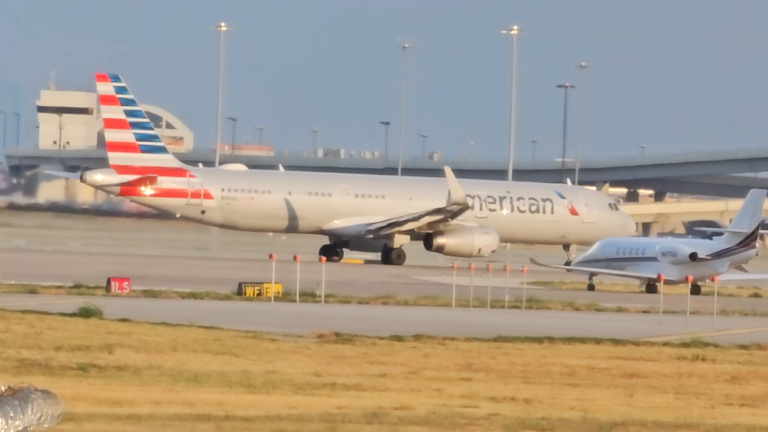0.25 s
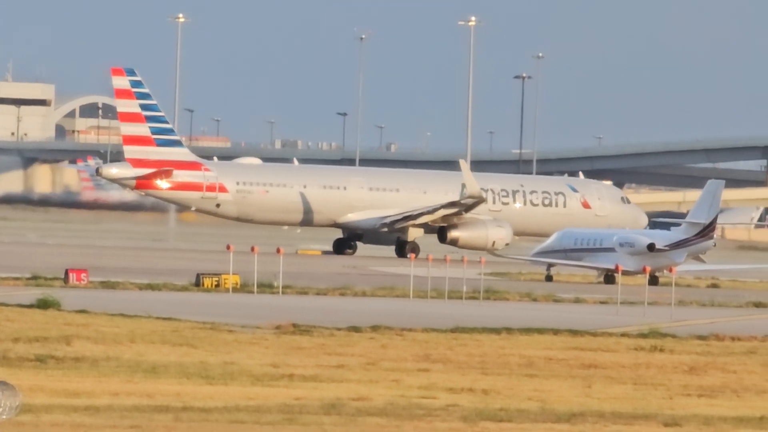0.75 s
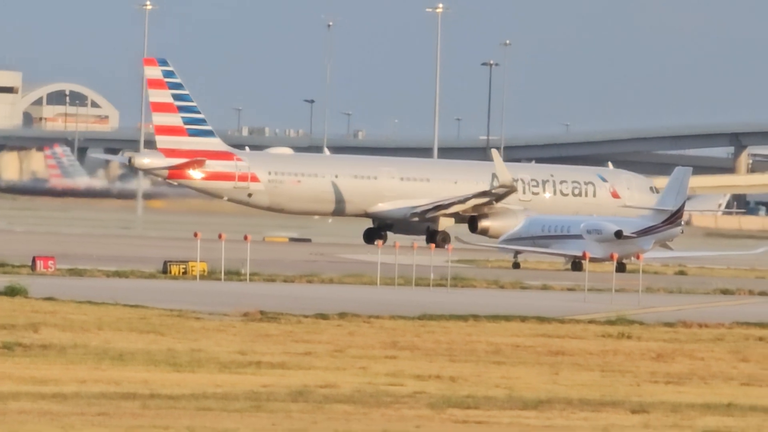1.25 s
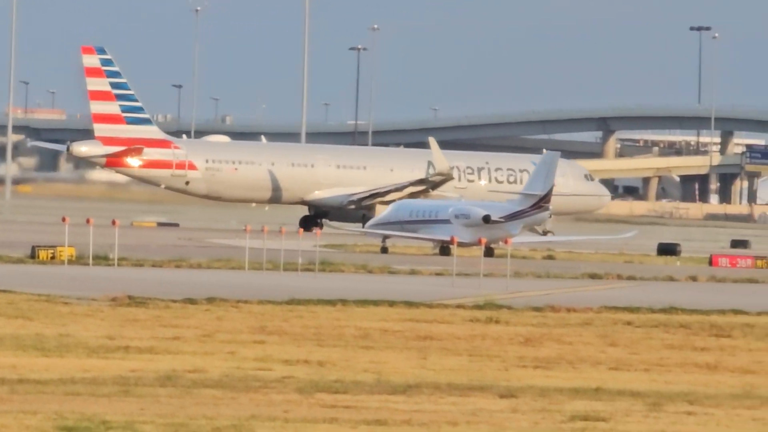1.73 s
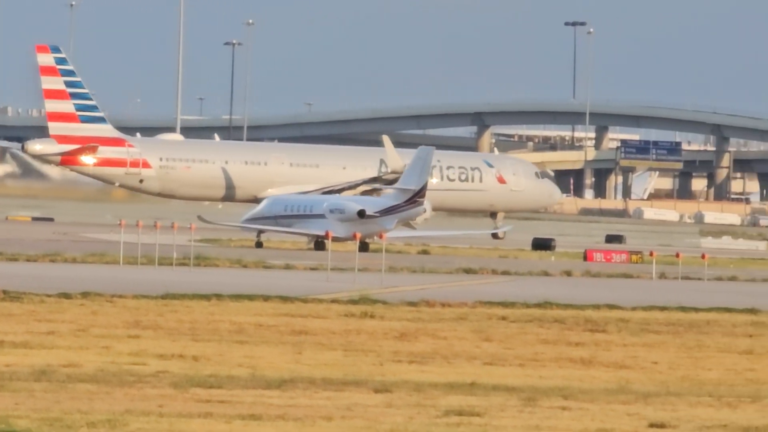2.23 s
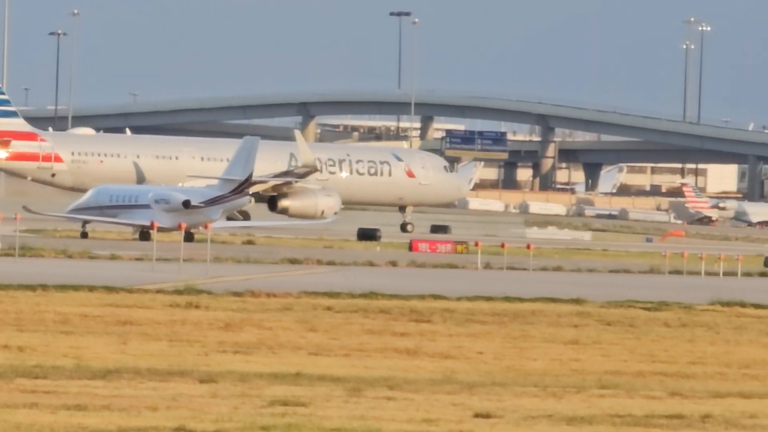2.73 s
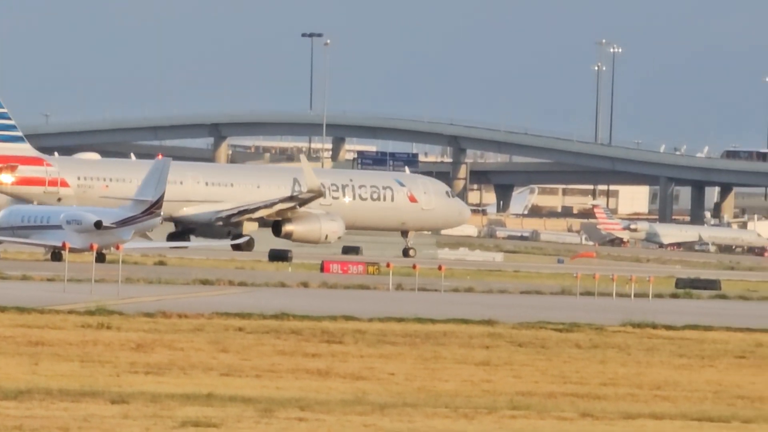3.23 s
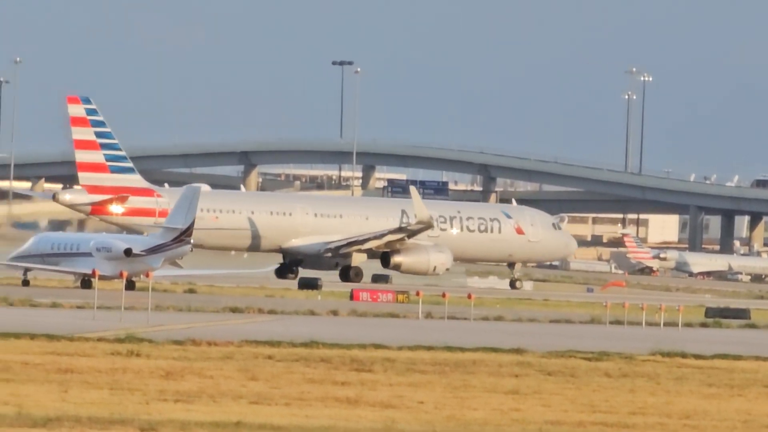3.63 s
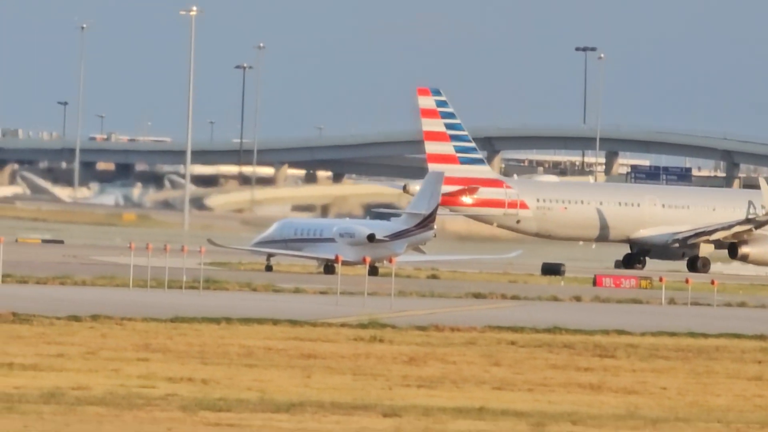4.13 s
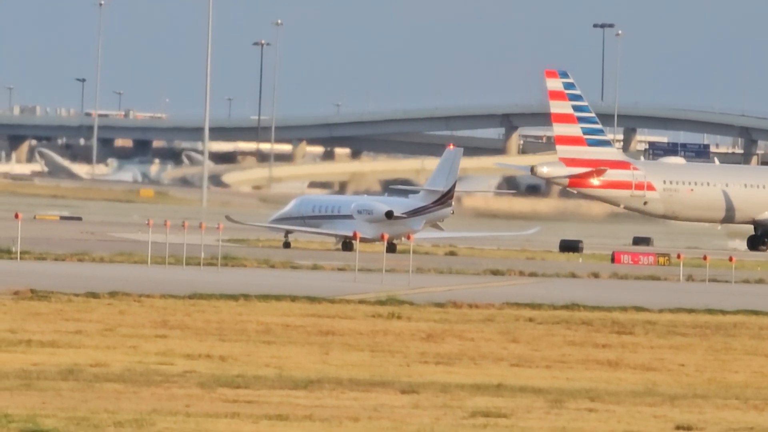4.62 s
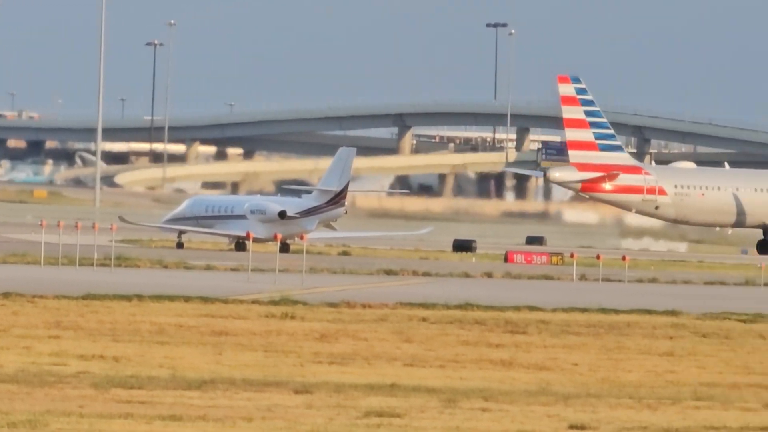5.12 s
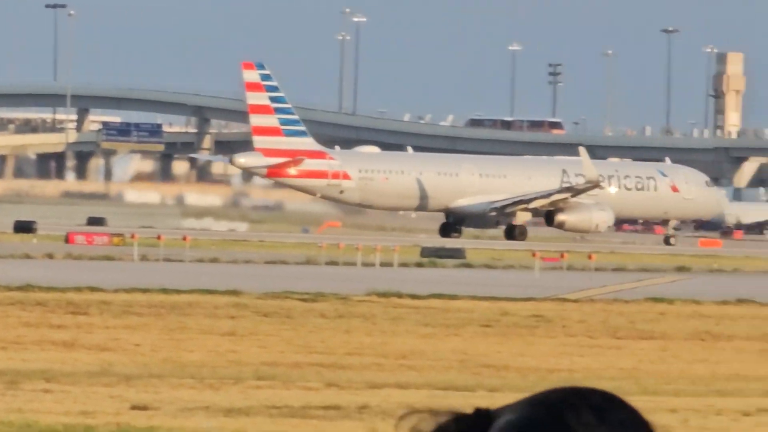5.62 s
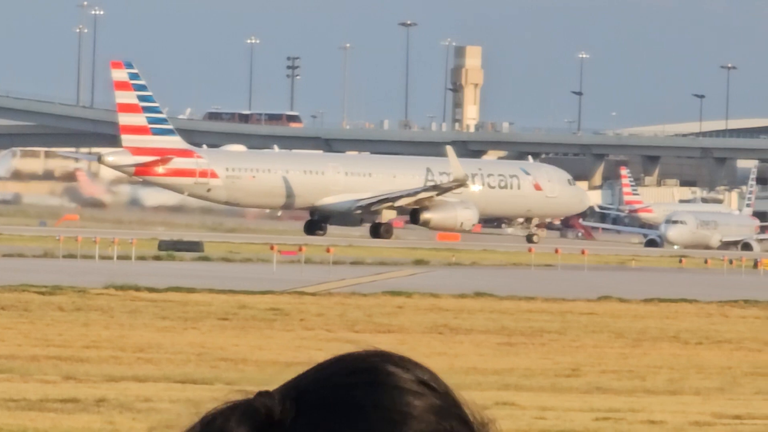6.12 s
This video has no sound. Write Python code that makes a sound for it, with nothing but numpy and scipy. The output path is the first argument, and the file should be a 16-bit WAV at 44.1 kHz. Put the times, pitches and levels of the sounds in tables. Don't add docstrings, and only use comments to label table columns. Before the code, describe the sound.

A phone microphone catches a distant taxiing airliner across open grass. First comes dull background rumble and a soft steady machine hum, then a brief rising turbine whine. The jet exhaust builds into a broad, bass-heavy roar with muted hiss, remaining loud and uneven as wind shifts its lows. Very faint high focus-motor rasping leans right, with small shell ticks and a light cloth brush late on.

```python
import sys
import numpy as np
from scipy import signal
from scipy.fft import rfft, irfft, next_fast_len
from scipy.io import wavfile
from scipy.ndimage import uniform_filter1d, minimum_filter1d, map_coordinates

SR = 44100
rng = np.random.default_rng(int(sys.argv[2]) if len(sys.argv) > 2 else 0)


def linear_from_db(decibels):
    return 10 ** (np.asarray(decibels, float) / 20)


def wav_out(sig):
    wavfile.write(sys.argv[1], SR, np.round(np.clip(np.atleast_2d(sig).T, -1, 1) * 32767).astype(np.int16))


N = 280476

# pitch_hz, density_db (per Hz)
AIRFIELD_SPECTRUM = [(15, -32), (25, -13.5), (82, 1.5), (297, -20.5), (389, -4), (457, -9.5), (848, -21.5),
                     (1020, -16.5), (1380, -19), (1800, -28.5), (2120, -23), (3930, -36.5), (6730, -54.5),
                     (9050, -53.5), (15500, -67)]
# pitch_hz, correlation_0to1
AIRFIELD_LIKENESS = [(60, 0.35), (240, 0.25), (950, 0.77), (3770, 0.19), (15000, 0.11)]
# start_s, pitch_hz, level_db
MACHINE_HUM = [
    (0, 390, -54),
    (.12, 391, -43),
    (.3, 393, -39.5),
    (.7, 394.5, -38),
    (.8, 393, -52),
    (1.05, 393, -52),
    (1.2, 392, -42),
    (2.2, 392, -43),
    (2.5, 392, -60),
]
# start_s, level_db
LENS_EFFORT = [(0, -68), (.3, -67.5), (.9, -65), (1.27, -65.5), (1.54, -60), (1.9, -62), (2.01, -57.5),
               (2.15, -62.5), (2.95, -61.5), (3.4, -62), (4.15, -62.5), (4.3, -60), (4.85, -58.5),
               (5.3, -59), (5.9, -62), (6.36, -61)]
# pitch_hz, gain_db
BODY_TO_LEFT = [(5000, -61.5), (6800, -21), (7300, -10.5), (9000, -10.5), (9800, -12.5), (10100, -18),
                (10900, -10.5), (11500, -8), (12300, -10.5), (13500, -11.5), (14100, -14), (15200, -13),
                (15600, -10)]
# pitch_hz, gain_db
BODY_TO_RIGHT = [(5000, -61), (6800, -17.5), (7300, -11), (7900, -11), (8150, -1), (8300, -14),
                 (8700, -1.5), (9000, -6), (9200, 2), (9700, -4), (10400, -7), (11000, -8), (11400, -4),
                 (11800, -10), (15500, -10.5)]
# pitch_hz, gain_db
STRAIN_COLOUR = [(6800, 1.5), (7500, 3.5), (8000, -2.5), (9200, 0), (9900, 0.5), (10400, 0), (11400, 3.5),
                 (11800, -0.5)]
# start_s, peak_db, left_over_right_db
SHELL_TICKS = [
    (0.166, -57, -2.5),
    (1.101, -50.5, -0.5),
    (1.662, -49, 0),
    (2.1742, -43.5, -3),
    (2.994, -50, -4),
    (3.262, -51, -4),
    (3.328, -51, -4),
    (4.537, -48, 7),
    (4.828, -51, -4),
]
# centre_s, half_length_s, level_db
CLOTH_BRUSHES = [
    (4.925, .02, -52),
    (4.973, .02, -47.5),
]
# start_s, blade_pitch_hz, level_db, overtone_level_db
FAN_WHINE = [
    (.9, 1440, -70, -70),
    (1.08, 1485, -56, -56),
    (1.22, 1525, -45, -52),
    (1.36, 1570, -37, -55),
    (1.5, 1615, -41, -59),
    (1.62, 1650, -50, -64),
    (1.85, 1720, -44, -62),
    (1.95, 1745, -54, -66),
    (2.4, 1850, -70, -70),
]
# start_s, roar_level_db, aft_0to1 (how far the exhaust points this way)
THRUST = [(0, -38.5, 0.14), (.3, -38, 0), (.7, -39, 0.37), (1, -35.5, 0.54), (1.3, -34, 0.87),
          (1.7, -28, 0.13), (2.1, -26.5, 0.55), (2.5, -23, 0), (2.9, -22.5, 0.06), (3.15, -20.5, 0),
          (3.4, -21, 0), (3.85, -21.5, 0.3), (4.1, -23, .6), (4.65, -22.5, 0.95), (5.2, -23.5, 1),
          (5.6, -23.5, 0.3), (5.9, -22.5, 0.4), (6.36, -22, 0)]
# pitch_hz, density_db (per Hz)
EXHAUST_SPECTRUM = [(15, -42), (28, -12), (65, 3), (85, -2.5), (100, -3), (160, -12), (280, -11.5),
                    (700, -22), (1500, -29.5), (2300, -35), (4000, -44.5), (4600, -49.5), (5200, -56.5),
                    (6800, -68), (9000, -110)]
# pitch_hz, correlation_0to1
EXHAUST_LIKENESS = [(30, 0.63), (70, 0.94), (150, 0.98), (380, 0.98), (950, 0.96), (2380, 0.86),
                    (5980, 0.27), (15000, 0.051)]
# centre_s, half_length_s, hiss_db
STILL_AIR = [
    (2.5, 0.074, 0.5),
    (3.45, .25, 4),
    (3.82, 0.07, 4),
    (4.82, 0.11, 4.5),
]
# centre_s, half_length_s, rumble_db, drone_db
PATH_GUSTS = [(.15, 0.1, -5.5, -1.5), (.39, 0.025, 1, 4.5), (.55, 0.07, -5, -1), (.75, 0.025, -11, -3),
              (.98, 0.022, 8.5, 5.5), (1.35, .04, 3.5, 0.5), (1.55, .1, 1, 2), (1.97, 0.034, -0.5, -3.5),
              (2.13, 0.048, 4, 0), (2.2, 0.035, -1, -1), (2.41, 0.028, -2, 4), (2.52, .02, -3, 0),
              (2.95, 0.05, 0.5, 6.5), (3.03, .025, -10, 1), (3.45, 0.14, 2, -1), (3.8, 0.027, -2.5, 3.5),
              (3.91, 0.054, -15, -0.5), (3.96, 0.061, 3, -8), (4.02, 0.019, -14.5, -0.5),
              (4.1, 0.052, -1, 0.5), (4.2, 0.043, 3, 3.5), (4.38, 0.022, -2, -3.5), (4.51, 0.029, -4.5, 5),
              (5.31, 0.031, 1.5, -3), (5.35, 0.023, 1.5, -8.5), (5.45, 0.057, -9, -1), (5.57, 0.097, 4, -1),
              (5.67, .025, 1, 1.5), (5.89, 0.044, -1, 3), (6.05, 0.054, 5.5, -1)]
# pitch_hz, width_hz,
# left_depth_db, right_depth_db
REFLECTION_NOTCHES = [(442.6, 127.7, -11, -15), (1047, 134, -6.5, -10.5), (1915, 170, -4.5, -4),
                      (2592, 223, -7, -9.5), (3325, 270, -2, -5.5), (6700, 1900, -2.5, 2)]
# centre_s, half_length_s, gain_db
GAIN_DUCKS = [
    (4.65, .04, -1.5),
    (4.96, 0.032, -2.5),
    (5.62, 0.028, -3.5),
]


def unit(x):
    return x / np.sqrt(np.mean(x ** 2) + 1e-20)


def along(points, hz):
    f, v = np.transpose(points)
    return np.interp(np.log(hz + 1), np.log(f + 1), v)


def curves(rows):
    s, *cols = np.transpose(rows)
    return [np.interp(np.arange(N) / SR, s, c) for c in cols]


def bumps(rows):
    s, half, *cols = np.transpose(rows)
    knots = np.arange(0, N + 64, 64)
    bell = np.exp(-((knots[:, None] / SR - s) / half) ** 2)
    return [np.interp(np.arange(N), knots, bell @ c) for c in cols]


def wobble(rate):
    knots = rng.standard_normal(int(N * 40 / SR) + 4)
    return map_coordinates(knots, [np.arange(N) * min(rate, 40) / SR])


def filtered(x, response):
    m = next_fast_len(N + 8192)
    return irfft(rfft(x, m) * response(np.fft.rfftfreq(m, 1 / SR)), m)[..., :N]


def lowpass(x, edge_hz):
    return filtered(x, lambda hz: 1 / (1 + (hz / edge_hz) ** 8))


def rush(spectrum, alike, patchy_db):
    z = signal.stft(rng.standard_normal((2, N + 2048)), nperseg=2048)[2]
    field = uniform_filter1d(rng.standard_normal(z.shape[1:]), size=3, axis=0)
    field = uniform_filter1d(field, size=8, axis=1)
    pair = signal.istft(z * linear_from_db(patchy_db * unit(field)), nperseg=2048)[1][:, :N]

    def mid_side(hz):
        angle = np.arccos(np.clip(along(alike, hz), -1, 1)) / 2
        return linear_from_db(along(spectrum, hz)) * [np.cos(angle), np.sin(angle)]

    mid, side = filtered(pair, mid_side)
    return unit(np.array([mid + side, mid - side]))


def evened(x, share):
    power = np.abs(uniform_filter1d(np.mean(x ** 2, axis=0), size=2600))
    return unit(x / power ** (share / 2))


def tone(hz, db, unsteady_db, drift_hz):
    phase = 2 * np.pi * np.cumsum(hz + drift_hz * wobble(25)) / SR
    return np.sqrt(2) * linear_from_db(db + unsteady_db * wobble(10)) * np.sin(phase)


def reflections(hz):
    depth_db = 0
    for centre, width, left, right in REFLECTION_NOTCHES:
        depth_db = depth_db + np.outer([left, right], np.exp(-((hz - centre) / width) ** 2))
    return linear_from_db(depth_db)


def airfield():
    hum_hz, hum_db = curves(MACHINE_HUM)
    noise = rush(AIRFIELD_SPECTRUM, AIRFIELD_LIKENESS, patchy_db=2.0)
    left, right = unit(filtered(noise, lambda hz: reflections(hz) ** 0.22))
    far = np.array([np.roll(left, 23), right])
    gust_gain = linear_from_db(bumps(PATH_GUSTS)[0])
    far = far + (gust_gain - 1) * lowpass(far, 140)
    return linear_from_db(-33 + 0.8 * wobble(5)) * far + tone(hum_hz, hum_db, unsteady_db=1.2, drift_hz=2)


def lens():
    turns = np.arange(N) * 30 / SR + 0.2
    count = turns.astype(int)
    size_db = 2.3 * rng.standard_normal(count.max() + 1)[count] - 4 * (count % 2)
    u = (turns % 1) / 0.1
    rasp = linear_from_db(size_db) * u ** 2 * np.exp(-u)
    near = unit(rasp + 0.38) * rng.standard_normal(N)
    near = 0.3 * near + 0.56 * lowpass(near, 11800)
    hiss = rush([(20, 0), (20000, 0)], [(20, 0)], patchy_db=2)
    heard = np.array([0.55 * np.roll(near, 23), 0.9 * near]) + 0.38 * hiss
    body = filtered(heard, lambda hz: linear_from_db([along(BODY_TO_LEFT, hz), along(BODY_TO_RIGHT, hz)]))
    strained = filtered(body, lambda hz: linear_from_db(along(STRAIN_COLOUR, hz)))
    shift, = bumps([(4.9, 0.97, 1)])
    body = body + shift * (strained - body)
    return linear_from_db(curves(LENS_EFFORT)[0] + 4.0 + 1.1 * wobble(9)) * unit(body)


def handling():
    out, t = np.zeros((2, N)), np.arange(N) / SR
    for s, peak_db, pan_db in SHELL_TICKS:
        out[:, round(s * SR) + 55] = linear_from_db(peak_db + 25 + np.array([pan_db, -pan_db]) / 2)
    for s, half, db in CLOTH_BRUSHES:
        swell = np.exp(-((t - s) / half) ** 2)
        out += linear_from_db(db + np.array([[0], [-12]])) * swell * rng.standard_normal(N)
    ring_hz, width_hz = 12800, 5000
    return filtered(out, lambda hz: 1j * hz * width_hz / (ring_hz ** 2 - hz * hz + 1j * hz * width_hz))


def fan():
    hz, db, overtone_db = curves(FAN_WHINE)
    blade = tone(hz, db, unsteady_db=2, drift_hz=7)
    return blade + tone(2 * hz, overtone_db, unsteady_db=4, drift_hz=25)


def jet():
    roar_db, aft = curves(THRUST)
    thrust_db = roar_db + 22
    rumble_gust_db, drone_gust_db = bumps(PATH_GUSTS)
    noise = filtered(rush(EXHAUST_SPECTRUM, EXHAUST_LIKENESS, patchy_db=1.61), reflections)

    rumble = lowpass(noise, 140)
    drone = lowpass(noise, 420) - rumble
    roar = lowpass(noise, 4000) - lowpass(noise, 420)
    hiss = noise - lowpass(noise, 4000)

    rumble_db = -10 + 1.22 * thrust_db + 3 * aft + rumble_gust_db
    drone_db = -17.5 + 1.08 * thrust_db + 5 * aft + drone_gust_db
    hiss_db = -49.5 + 0.48 * thrust_db + bumps(STILL_AIR)[0] + 0.76 * wobble(5.2)

    low = linear_from_db(rumble_db) * evened(rumble, share=0.55) + linear_from_db(drone_db) * evened(drone, share=0.56)
    return low + linear_from_db(roar_db) * evened(roar, share=0.53) + linear_from_db(hiss_db) * unit(hiss)


def scene():
    return airfield() + lens() + handling() + fan() + jet()


def top_cut(x):
    return signal.sosfilt(signal.butter(12, 15740, fs=SR, output="sos"), x)


def record(dry):
    def port_lag(hz):
        one_sample = np.exp(np.outer([1j, -1j], hz * np.pi * 2 / SR))
        return one_sample * (hz < 15800)

    x = linear_from_db(0.37 + bumps(GAIN_DUCKS)[0]) * filtered(dry, port_lag)
    needed = np.minimum(1, 0.99 / (np.abs(x).max(axis=0) + 1e-9))
    gain = uniform_filter1d(minimum_filter1d(needed, size=300), size=300)
    return top_cut(x * gain)


dry = scene()
out = record(dry)
wav_out(out)
```